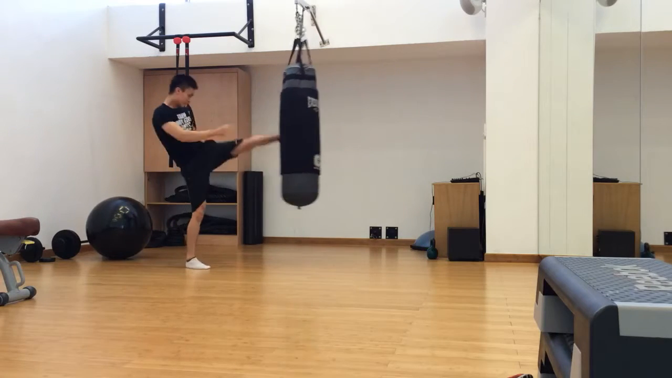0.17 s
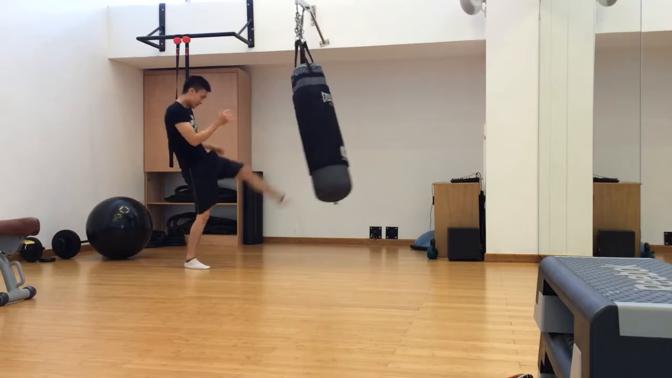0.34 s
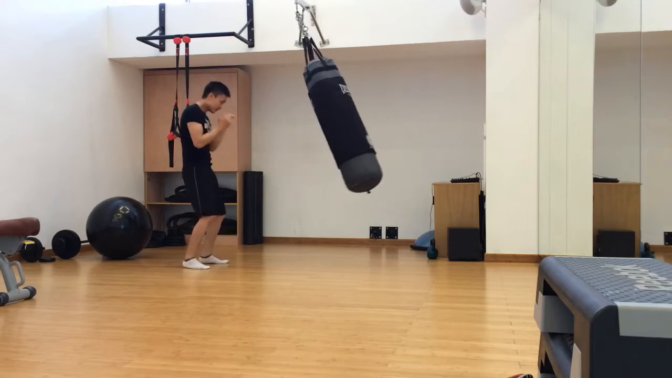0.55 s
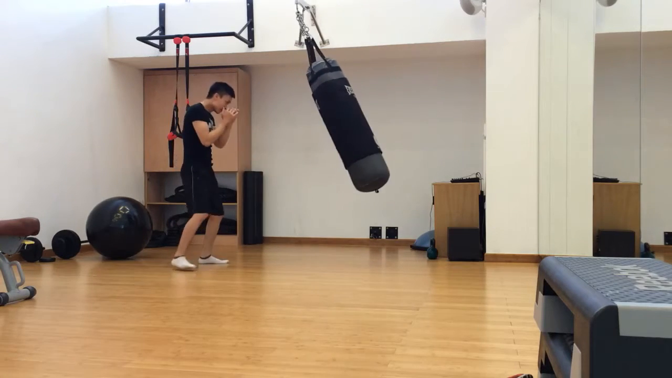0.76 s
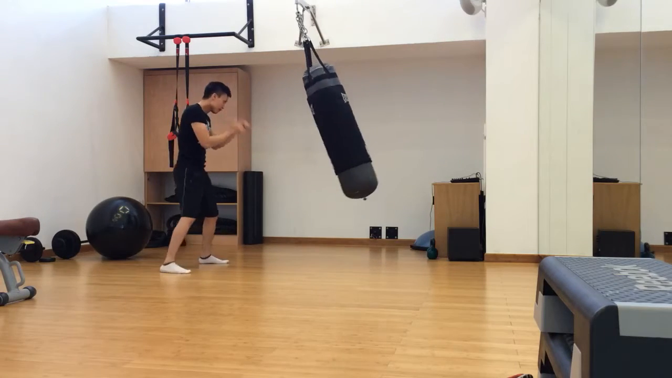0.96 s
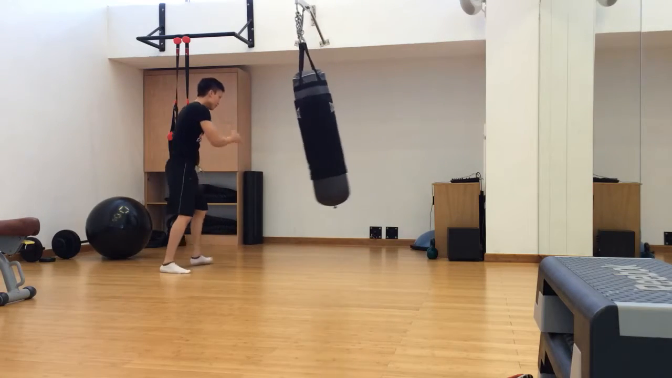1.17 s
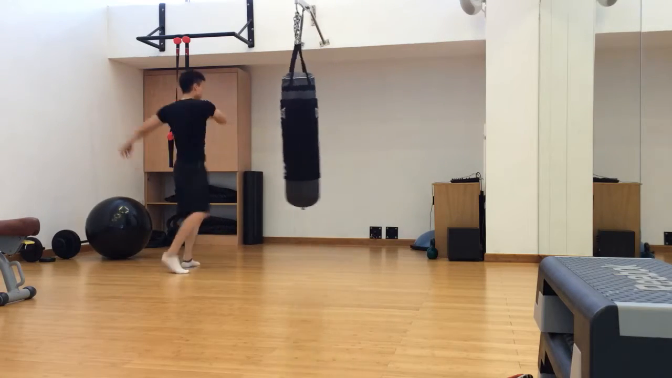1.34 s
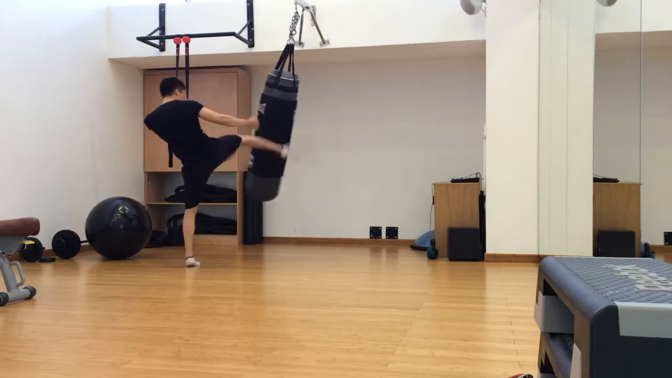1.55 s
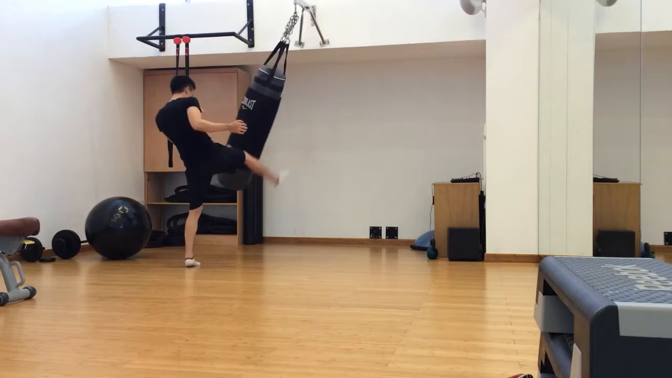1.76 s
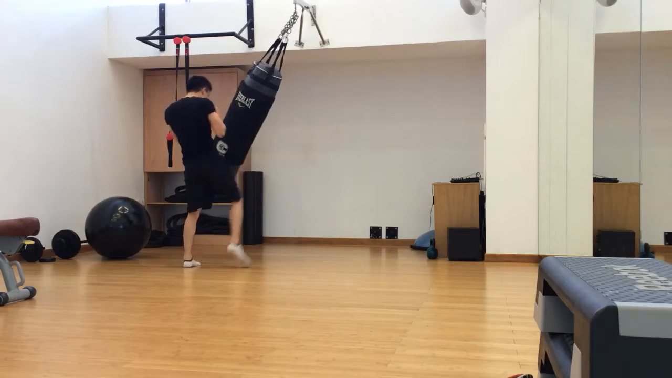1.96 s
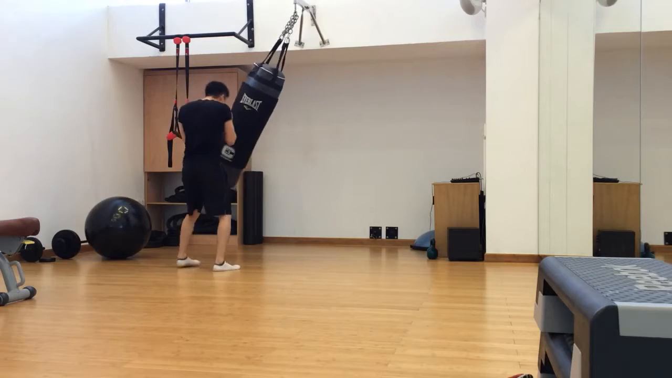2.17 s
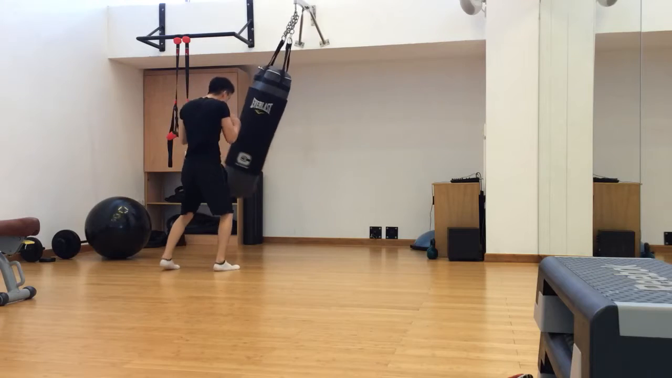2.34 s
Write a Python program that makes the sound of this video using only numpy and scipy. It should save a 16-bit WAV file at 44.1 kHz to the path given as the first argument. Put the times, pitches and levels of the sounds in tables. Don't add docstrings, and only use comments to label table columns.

```python
import sys
import numpy as np
from scipy import signal
from scipy.io import wavfile
from scipy.ndimage import minimum_filter1d

SR = 44100
rng = np.random.default_rng(int(sys.argv[2]) if len(sys.argv) > 2 else 0)


def pcm_store(signal):
    levels = np.round(np.clip(np.atleast_2d(signal), -1, 1) * 32767)
    wavfile.write(sys.argv[1], SR, levels.astype(np.int16).T)


def amplitude_ratio(level_db):
    exponent = np.asarray(level_db, float) / 20
    return 10 ** exponent


N = 110250
T = np.arange(N) / SR

# (time [s], boom level [dB], slap level [dB], slap layer spacing [s], tail level [dB])
KICKS = [
    (0.2152, -6, 0, 0.00129, -16),
    (1.6694, -6.5, 5, 0.0006, -15.5),
]
# (frequency [Hz], level [dB], t60 [s])
MODES = [(49, -40, 0.39), (69, -23, 0.66), (76.22, -10, 0.8), (86.4, -21, 1), (100.94, -3.5, 0.52),
         (119.2, -11, 0.69), (139, -27, 0.79), (179.9, -0.5, 0.31), (232, -24, 0.48), (307, -10, 0.28),
         (384, -6, 1), (445.5, -5, 1), (538, -4, 0.71)]
# (frequency [Hz], density [dB per Hz])
TAIL_SPECTRUM = [(30, -9), (80, -5.5), (250, -11), (700, -19.5), (1600, -20), (4000, -28.5), (10000, -40.5),
                 (16000, -35)]
# (frequency [Hz], t60 [s])
ROOM_DECAY = [(60, 1.32), (200, 1.126), (600, 2.08), (1500, 2.77), (2500, 2.324), (5000, 1.784),
              (9000, 1.77), (13000, 1.3)]
# (time [s], level [dB])
THUDS = [(.002, -33.5), (0.266, -12), (0.304, -7.5), (.375, -25), (0.481, -19.5), (.71, -21),
         (0.832, -26.5), (1.118, -54.5), (1.602, -26.5), (1.726, -24), (1.777, -11.5), (1.815, -24),
         (1.938, -22), (2.059, -27.5), (2.216, -28.5), (2.282, -34)]
# (time [s], level [dB], length [s], side links relative to main links [dB])
JOLTS = [(0.24, -22, 0.12, -5.5), (0.251, -24, 0.05, 5.5), (0.372, -28, 0.021, 6), (0.451, -31.5, 0.08, -3),
         (0.577, -32.5, 0.15, 3), (.74, -47, 0.13, -11), (0.853, -21, 0.022, -18), (0.964, -58, 0.03, -53),
         (1.103, -43.5, 0.045, -31), (1.19, -65, 0.02, -20), (1.704, -28, 0.15, -3.5),
         (1.736, -36, 0.15, -10.5), (1.806, -32, .07, -2), (1.944, -43, 0.028, -5),
         (2.02, -38.5, 0.017, -2), (2.205, -83, 0.042, -26)]
LINK_HZ = [11900, 12050, 12650, 12800, 12950, 13070, 13330, 13480, 13800, 14080, 14350, 14520, 14800, 15150]
# (level [dB], t60 [s])
LINK_RINGS = [(-9, .09), (-14, .06), (-4, .11), (-2, .14), (-4, .1), (1, .2), (-2, .11), (-4, .11),
              (-3, .14), (-6, .09), (-6, .09), (-5, .11), (-8, .07), (-11, .06)]
# (frequency [Hz], density [dB per Hz])
HUSH_SPECTRUM = [(15, -36), (25, -5.5), (96, -4), (119, -7.5), (183, -12.5), (267, -17), (648, -23.5),
                 (8130, -39), (15500, -47.5)]


def at_hz(points, hz):
    table = np.array(points)
    return np.interp(np.log(hz), np.log(table[:, 0]), table[:, 1])


def rms_one(x):
    return x / np.sqrt(np.mean(x ** 2) + 1e-20)


def click(time_s, level_db):
    x = np.zeros(N)
    x[int(time_s * SR)] = amplitude_ratio(level_db)
    return x


def ring(clicks, hz, t60_s):
    r = amplitude_ratio(-60 / (t60_s * SR))
    w = 2 * np.pi * hz / SR
    return signal.lfilter([0, np.sin(w)], [1, -2 * r * np.cos(w), r * r], clicks + 1e-18)


def low(x, hz):
    r = np.exp(-2 * np.pi * hz / SR)
    return signal.lfilter([(1 - r) ** 2], [1, -2 * r, r * r], x)


def bandpass(x, order, low_hz, high_hz):
    return signal.sosfilt(signal.butter(order, [low_hz, high_hz], "band", fs=SR, output="sos"), x)


def bands(spectrum, lump_db, lump_hz):
    white = rng.standard_normal((2, N))
    edges_hz = 25 * 2 ** np.arange(0, 9.5, 1 / 3)
    centres_hz = np.sqrt(edges_hz[1:] * edges_hz[:-1])
    shared = rms_one(low(rng.standard_normal(N), lump_hz))
    out = []
    for k, centre_hz in enumerate(centres_hz):
        noise = bandpass(white[k % 2], 2, edges_hz[k], edges_hz[k + 1])
        own = rms_one(low(np.roll(white[1 - k % 2], 3001 * k), lump_hz))
        flicker_db = lump_db * (0.4 * shared + own)
        out.append(noise * amplitude_ratio(at_hz(spectrum, centre_hz) + flicker_db))
    return centres_hz, np.array(out) / np.sqrt(np.mean(np.sum(out, axis=0) ** 2))


def dying(hz, t):
    t60_s = at_hz(ROOM_DECAY, hz)[:, None]
    return amplitude_ratio(-60 * np.maximum(t, 0) / t60_s) * (t >= 0)


def air_dent(t):
    squash_s, release_s, level_db = 0.008, 0.0025, -0.5
    return -amplitude_ratio(level_db) * np.clip(1 + t / squash_s, 0, 1) ** 2 * np.exp(-np.maximum(t, 0) / release_s)


def boom(time_s, level_db):
    push_lag_s, contact_hz = 0.0013, 238
    push = low(click(time_s + push_lag_s, level_db), contact_hz)
    return sum(amplitude_ratio(db + rng.normal(0, 1.4)) * ring(push, hz, t60_s) for hz, db, t60_s in MODES)


def slap(time_s, level_db, layer_s):
    loss_db, soft_hz, slap_hz, t60_s = 3, 5500, 2300, 0.0012
    snaps = sum(click(time_s + j * layer_s, level_db - j * loss_db) for j in range(3))
    return -ring(low(snaps, soft_hz), slap_hz, t60_s)


def kick_tail(t, level_db, tilt_db_per_octave):
    build_s, early_db, early_s = 0.0073, 4, 0.18
    hz, noise = bands(TAIL_SPECTRUM, lump_db=1.5, lump_hz=60)
    tilt = amplitude_ratio(tilt_db_per_octave * np.log2(hz / 1000))[:, None]
    late_s = np.maximum(t, 0)
    swell = (1 - np.exp(-late_s / build_s)) * amplitude_ratio(level_db + early_db * np.exp(-late_s / early_s))
    return swell * np.sum(tilt * noise * dying(hz, t), axis=0)


def kicks():
    out = np.zeros(N)
    for k, (time_s, boom_db, slap_db, layer_s, tail_db) in enumerate(KICKS):
        t = T - time_s
        out += air_dent(t) + boom(time_s, boom_db) + slap(time_s, slap_db, layer_s)
        out += kick_tail(t, tail_db, tilt_db_per_octave=0.05 * k)
    return out


def thuds():
    contact_hz, damping = 102, 0.53
    mix_db = rng.normal(0, 1.86, (len(THUDS), len(MODES)))
    out = np.zeros(N)
    for k, (hz, mode_db, t60_s) in enumerate(MODES):
        blows = sum(click(time_s, db + m) for (time_s, db), m in zip(THUDS, mix_db[:, k]))
        out += amplitude_ratio(mode_db) * ring(low(blows, contact_hz), hz, damping * t60_s)
    return out


def room(x):
    hz, noise = bands([(20, 0), (20000, 0)], lump_db=1.5, lump_hz=40)
    answer = np.sum(noise * dying(hz, T - 0.008), axis=0)
    return signal.fftconvolve(x, answer)[:N] / np.sqrt(0.03 * SR)


def link_knocks():
    rise_s, knocks_per_s, spread_db = 0.012, 1500, 3.0
    power = np.zeros((2, N))
    for time_s, db, length_s, side_db in JOLTS:
        t = np.maximum(T - time_s, 0)
        envelope = (1 - np.exp(-t / rise_s)) ** 2 * np.exp(-(t / length_s) ** 2)
        power += amplitude_ratio(2 * np.array([[db + side_db], [db]])) * envelope
    born = rng.random(N) < knocks_per_s / SR
    size = amplitude_ratio(spread_db * np.minimum(rng.exponential(1, N), 3)) * rng.choice([-1, 1], N)
    return np.sqrt(power) * rms_one(born * size)


def chain():
    detune, tick_db, ring_wet_db, tick_wet_db = 0.009, -11.5, -15.5, 6.5
    knocks = link_knocks()
    rings = np.zeros(N)
    for hz, (db, t60_s) in zip(LINK_HZ, LINK_RINGS):
        row = int(12500 < hz < 13200)
        for off in rng.uniform(-1.03, 1, size=4):
            hits = knocks[row] * rng.standard_normal(N)
            rings += amplitude_ratio(db) * ring(hits, hz * (1 + detune * off), t60_s) / np.sqrt(t60_s * SR)
    ticks = amplitude_ratio(tick_db) * bandpass(knocks[0], 1, 900, 3500)
    return rings + ticks + room(amplitude_ratio(ring_wet_db) * rings + amplitude_ratio(tick_wet_db) * ticks)


def hush():
    hush_db, earlier_db = -45, -51.5
    air = np.sum(bands(HUSH_SPECTRUM, lump_db=3.5, lump_hz=2.7)[1], axis=0)
    hz, noise = bands(TAIL_SPECTRUM, lump_db=1.5, lump_hz=30)
    return amplitude_ratio(hush_db) * air + amplitude_ratio(earlier_db) * np.sum(noise * dying(hz, T), axis=0)


def scene():
    return np.tile(kicks() + thuds() + chain() + hush(), (2, 1))


def gain_control(x):
    knee_db, squeeze, release_db_per_s, attack_s = -26, 0.076, 24, 0.012
    level_db = 10 * np.log10(low(x ** 2, 37) + 1e-12)
    release_db = release_db_per_s * T
    held_db = np.maximum.accumulate(level_db + release_db) - release_db
    cut_db = low(squeeze * np.maximum(held_db - knee_db, 0), 1 / (2 * np.pi * attack_s))
    return x * amplitude_ratio(-cut_db)


def drop_masked(x):
    mask_db, tilt_db_per_khz, from_hz, wobble_db = -28, 2, 11200, 4
    hz, _, z = signal.stft(x, SR, nperseg=2048)
    hz = hz[:-1]
    power = np.abs(z[:1024]) ** 2 + 1e-20
    band = np.repeat(power.reshape(128, 8, -1).mean(axis=1), 8, axis=0)
    mids = power[(hz > 800) & (hz < 3000)].mean(axis=0)
    mids = minimum_filter1d(mids, size=5)
    frames = len(mids)
    wobble = wobble_db * np.repeat(rng.standard_normal(frames), 2)[:frames]
    wobble = wobble + np.repeat(rng.normal(0, 2, (128, frames)), 8, axis=0)
    tilt_db = tilt_db_per_khz * (hz[:, None] - 13000) / 1000
    limit = amplitude_ratio(1.85 * (mask_db + tilt_db + wobble)) * mids
    z[:-1] *= (band > limit) | (hz[:, None] < from_hz)
    return signal.istft(z, SR, nperseg=2048)[1][:N]


def top_cut(x):
    return signal.sosfilt(signal.butter(12, 16040, fs=SR, output="sos"), x)


def record(dry):
    mic_low_hz, peak, cutoff_hz = 44, 1.11, 15330
    x = signal.sosfilt(signal.butter(3, mic_low_hz, "high", fs=SR, output="sos"), dry[0])
    x = peak * np.tanh(gain_control(x) / peak)
    x = signal.sosfilt(signal.ellip(10, 0.5, 60, cutoff_hz, fs=SR, output="sos"), x)
    mix = np.tile(drop_masked(x), (2, 1))
    return top_cut(mix)


dry = scene()
out = record(dry)
pcm_store(out)
```